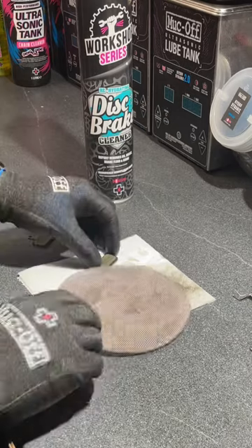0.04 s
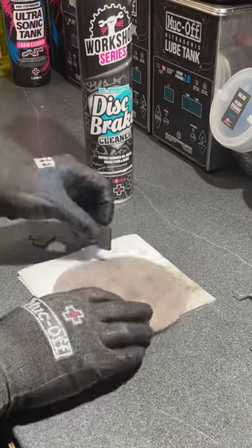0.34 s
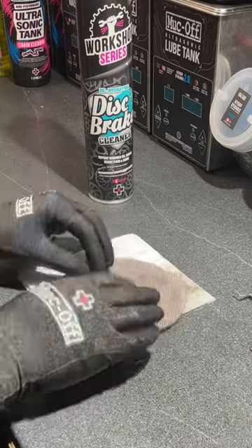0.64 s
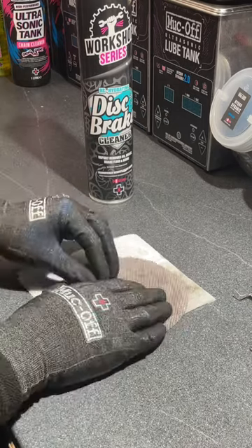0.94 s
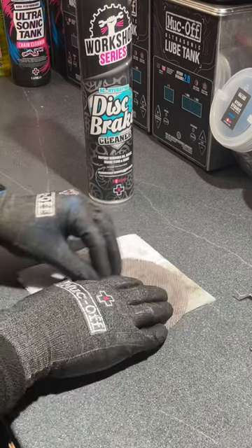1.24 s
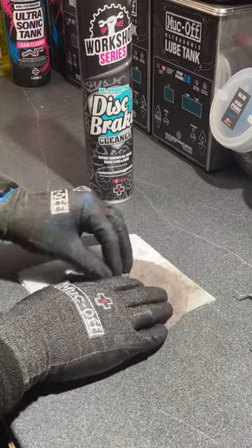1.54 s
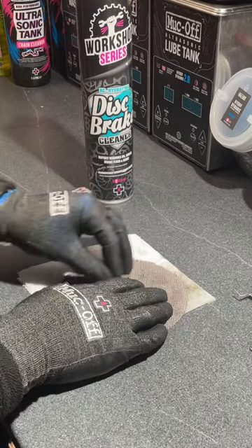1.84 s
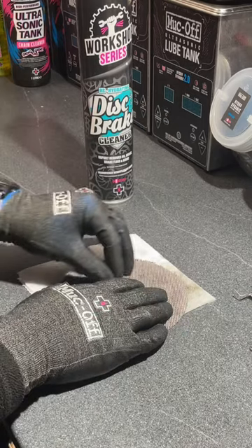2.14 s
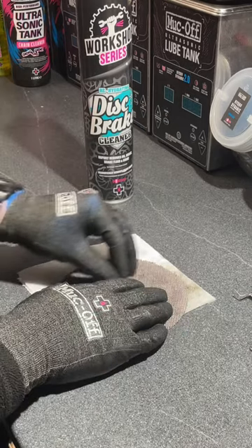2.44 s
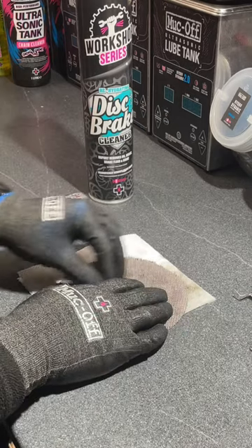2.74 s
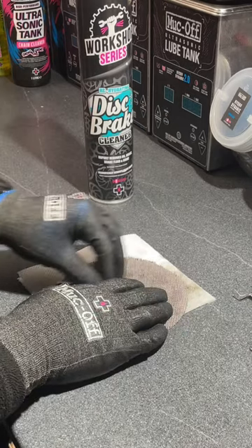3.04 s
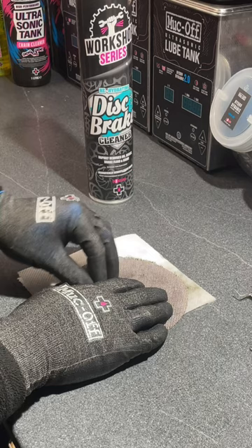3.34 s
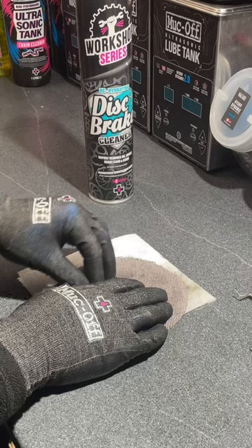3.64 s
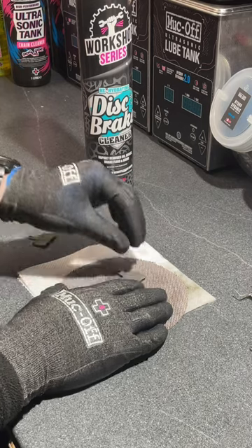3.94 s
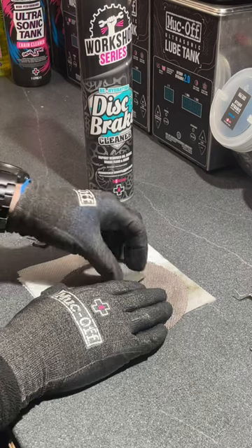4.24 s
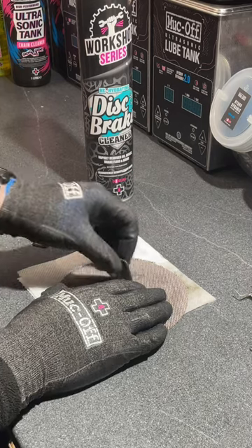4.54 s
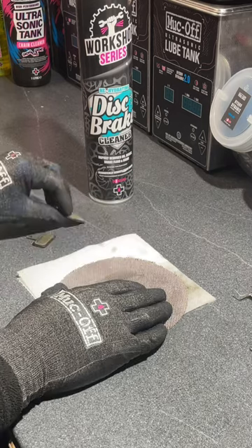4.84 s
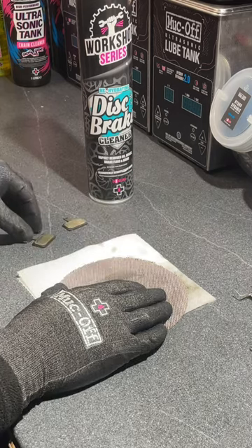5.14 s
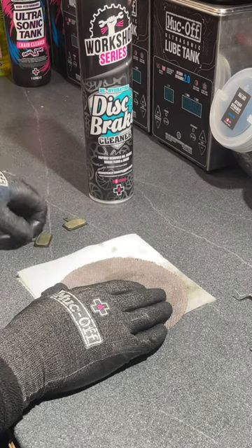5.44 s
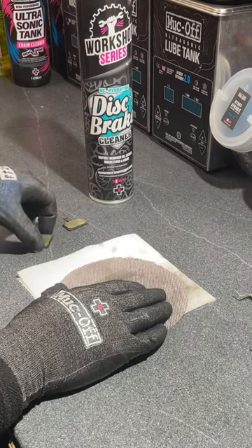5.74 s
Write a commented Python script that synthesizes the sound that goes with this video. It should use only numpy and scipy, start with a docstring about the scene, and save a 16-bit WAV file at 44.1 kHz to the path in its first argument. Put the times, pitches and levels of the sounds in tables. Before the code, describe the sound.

At first there is only faint glove rustle and a few tiny ticks of a small brake pad between fingertips. From about 0.9 seconds the pad is scrubbed rapidly back and forth on an abrasive disc, around twelve short, gritty strokes a second. The rasping grows a little louder and brighter, while the workbench rumbles and gives a few dull bumps underneath. The scrubbing stops at about 3.7 seconds, leaving soft rustles and light taps. At about 4.75 seconds the pad drops onto the bench, skids briefly and bounces in a sharp, bright clatter with a slight metallic ping, the loudest moment, settling before 5 seconds. A lighter click comes at 5.3 seconds, then a soft, deep thud of a hand at 5.5, followed by faint scrapes and glove swishes. Everything sounds close, in a small workshop with little echo and a faint low rumble of air.

```python
"""A small bicycle brake pad is scrubbed to and fro by a gloved hand on an abrasive disc on a workbench.
Grit catches the pad, so each stroke rasps, and the drag makes the bench rumble. Then the pad is
dropped: it clatters, skids and rattles. A pad clicks on the bench top, and the hand comes down with
a soft thud. Gloves rustle in between, over the low rumble of the room's air."""
import sys
import numpy as np
from scipy import signal
from scipy.fft import rfft, irfft, next_fast_len
from scipy.io import wavfile
from scipy.ndimage import uniform_filter1d, map_coordinates

SR = 44100
rng = np.random.default_rng(int(sys.argv[2]) if len(sys.argv) > 2 else 0)


def file_out(sig):
    """Save sig as 16-bit WAV at sys.argv[1]."""
    # one column per channel
    cols = np.atleast_2d(sig).T
    # limit, then scale
    lim = np.clip(cols, -1, 1)
    pcm = np.round(lim * 32767).astype(np.int16)
    wavfile.write(sys.argv[1], SR, pcm)


N = 259749
TIME = np.arange(N) / SR
FFT_SIZE = next_fast_len(N + SR // 2, True)
FREQS = np.arange(FFT_SIZE // 2 + 1) * SR / FFT_SIZE

# Levels in the tables are relative: the functions add their own gains.
# The strokes, away and back in turn. Each row: start in seconds, rasp level in dB, then brightness,
# fine hiss and judder, each in dB compared with the rasp.
STROKES = [(0.878, -43.5, -13, -5.5, -1), (0.958, -42, -18, -3, 0.5), (1.05, -41.5, -2.5, -0.5, 0.5),
           (1.132, -41, -10, -2.5, 3.5), (1.217, -36.5, -14, -6.5, -6.5), (1.29, -42.5, -0.5, 1.5, 3.5),
           (1.373, -36.5, -5, -5, -4.5), (1.451, -41.5, -0.5, -2, 4), (1.533, -37, -6, -3.0, -5),
           (1.607, -40, 0, -2.0, 2), (1.69, -37, -1, -2.5, -2), (1.766, -41.0, 3.5, 0.5, 4),
           (1.845, -35.5, -1.5, -3.0, -3.5), (1.92, -39.5, 1, -2, 6.5), (2.003, -35, -3, -3.5, -4),
           (2.08, -41, 1.5, 1.5, 10), (2.16, -34, 0, 0, -4), (2.238, -39.5, 3.5, 3.5, 5.5),
           (2.317, -35, 2, -1.5, -3.5), (2.397, -38, 3.5, 2.5, 2.5), (2.476, -35, -4.5, 0, -4),
           (2.555, -37.0, 1, 1.5, 4), (2.63, -37.5, 1.5, 4, 2), (2.711, -36.5, 2.5, 0.5, 6),
           (2.786, -35.5, 0.5, 3, -3), (2.867, -38, 3.0, 2.0, 5.5), (2.943, -37.5, 1.5, 4, 3.5),
           (3.024, -38.5, 4.5, 3, 4), (3.101, -39, 4.5, 5.5, 6), (3.183, -38.5, 5.5, 5, 7),
           (3.256, -39.5, 3, 7.5, 0.5), (3.335, -38.0, -1.5, 2.5, 5.0), (3.413, -37, 0.5, 6.5, 1),
           (3.49, -35, -11, 2.5, 1.5), (3.571, -33.5, -15.5, 2.5, 4.0)]
SCRUB_END_S = 3.68
# Tone colours. Each row: frequency in Hz, level there in dB.
GRIT_COLOUR = [(200, -11.5), (450, -1), (900, -3), (1150, -5), (2000, 3.5), (3300, 4.5), (4400, -8),
               (5800, -13.5), (8500, -14.5), (11000, -20), (13500, -18), (16000, -34)]  # grit on the pad's face
STRIKE_COLOUR = [(100, -18.5), (450, -6.5), (620, -12.5), (800, -6), (1300, -5.5), (1900, -4), (3000, -2.5),
                 (5000, -1), (8000, -4), (10500, -7.5), (13500, 2.5), (16000, -21.5)]  # a pad hitting the bench
SWISH_COLOUR = [(2000, -12), (3800, -7.5), (6000, -2.5), (9000, 0), (12000, 1), (14000, -3), (16000, -17.5)]  # a glove's bright swish
SCUFF_COLOUR = [(300, 6.5), (800, 0.5), (1400, -2), (2400, -5.5), (3500, -6.5), (6000, -6), (12000, -40)]  # a glove's duller scuff
THUD_COLOUR = [(25, -32), (40, -16), (55, -0.5), (100, 1), (200, -5), (330, -20.5), (520, -19.5),
               (700, -33.5), (3000, -49.5), (8000, -75)]  # the hand bumping the bench
AIR_COLOUR = [(12, -47), (20, -29), (60, -10.5), (158, 1.5), (210, -5.5), (270, -8.5), (738, -29),
              (4180, -43.5), (6360, -41.5), (11400, -41.5), (12400, -39.5), (13900, -58), (16000, -65)]  # the room's air
# Resonances, the pitches at which a thing rings. Each row: pitch in Hz, width in Hz, gain in dB.
RASP_MODES = [(1110, 24, -4), (1285, 40, 11), (1461, 40, 3), (1579, 78, 5.5), (1800, 64, 4),
              (1909, 71, 10.5), (2167, 40, -5.5), (2279, 117, 1), (2930, 89, -5), (3185, 84, -2),
              (3493, 73, 1), (3780, 41, -6.5), (4153, 70, 10), (4267, 54, 9.5), (4680, 94, 0.5),
              (4910, 45, 7), (5200, 65, 6.5), (5620, 69, 4.5), (6430, 29, -0.5), (6870, 25, 3.5),
              (7720, 250, -10), (9360, 120, -4), (10570, 200, -3)]  # the held pad and the bench top
JUDDER_MODES = [(417.5, 13, 2.5), (461.6, 25.5, 0.5), (526, 16, -2.5), (658, 110, -4), (763, 35, 7),
                (940, 17, -7)]  # the pad shaking in the fingers
BENCH_MODES = [(104.6, 5.8, 3), (132, 14, 2), (168, 9.2, -2.5), (214.8, 20, -3.5), (283.4, 5.3, -1),
               (320, 120, -13), (469, 170, -11)]  # the whole bench
LOOSE_PAD_MODES = [(768, 34, 10), (860, 50, -2), (965, 55, 7), (1820, 190, 8), (2250, 80, 7.5),
                   (3080, 90, -2), (3600, 260, -3), (4540, 240, 5), (5350, 260, 2), (6240, 130, 1),
                   (7620, 220, 2), (8500, 220, -1), (9200, 260, 1)]  # the loose pad on the bench top
# Gaps where the held pad's resonances cancel. Each row: frequency in Hz, width in Hz.
NOTCHES = [(1685, 70), (2050, 45), (2660, 50), (3920, 90), (5070, 70), (5830, 120), (7400, 170)]
# A pad hits the bench top. Each row: time in seconds, level in dB, treble cut-off in Hz.
STRIKES = [(4.411, -35.5, 1160), (4.433, -38.5, 2460), (4.7494, -9.5, 6300), (4.752, -17, 5500),
           (4.8345, -18, 10100), (4.8374, -4.5, 15200), (4.839, -8.5, 14000), (4.8630, -17, 12000),
           (4.8698, -15, 12000), (4.871, -12.5, 12000), (4.8828, -24.5, 10000), (4.8902, -14.5, 10000),
           (4.892, -15.5, 10940), (4.9036, -18, 8050), (4.9054, -17, 10130), (4.9140, -18, 10000),
           (4.917, -25, 10000), (4.9242, -22, 10000), (5.304, -18.5, 5960), (5.3057, -11.5, 5120)]
# The pad's metal backing plate rings. Each row: pitch in Hz, level in dB, seconds to fade by 60 dB.
PLATE_MODES = [(10920, -26, .08), (11100, -37, 0.08), (13100, -40.5, .09)]
# A pad chatters on its edges. Each row: start in seconds, level in dB, length in seconds,
# treble cut-off in Hz.
RATTLES = [(4.761, -38.5, 0.02, 5080), (4.835, -32.5, 0.043, 13900), (4.891, -40, 0.025, 11000),
           (5.312, -45, 0.013, 6000)]
# The dropped pad skids on its edge. Each row: time in seconds, pitch in Hz, level in dB.
SKID_PATH = [(4.755, 1900, -66), (4.766, 1950, -44), (4.777, 2250, -36.5), (4.792, 2400, -48),
             (4.806, 2150, -48.5), (4.826, 2000, -50.5), (4.836, 2000, -75.5)]
# A pad slides a little. Each row: start in seconds, level in dB, length in seconds,
# centre of its band in Hz, width of the band in Hz.
SLIDES = [(4.92, -45, 0.018, 890, 404), (5.158, -62, 0.056, 940, 400), (5.261, -54.5, 0.047, 2760, 1140),
          (5.306, -44.5, 0.019, 4900, 596), (5.345, -61, 0.052, 980, 400), (5.617, -51, 0.019, 1920, 688),
          (5.65, -56.5, 0.022, 2470, 900), (5.811, -58.5, 0.016, 2700, 1400),
          (5.833, -55, 0.016, 1930, 1610)]
# The whole bench is jolted. Each row: time in seconds, level in dB.
KNOCKS = [(0.557, -47), (1.236, -49), (1.719, -33), (2.178, -28.5), (2.967, -29.5), (3.321, -35.5),
          (3.655, -41), (4.7502, -48), (4.837, -41), (5.016, -38), (5.306, -46), (5.484, -38), (5.512, -37)]
# Brief touches. Each row: start in seconds, level in dB, length in seconds.
THUDS = [(1.43, -51, 0.28), (5.461, -38.5, 0.047), (5.478, -37.5, 0.037), (5.54, -48, 0.067)]  # hand and wrist on the bench
TICKS = [(.455, -59, 0.0044), (.507, -53.5, .002), (.529, -58, 0.0049), (.555, -59.5, 0.0024),
         (.677, -56, 0.0023), (4.01, -70, 0.0082), (4.135, -60.5, 0.017), (4.175, -68, .004),
         (4.237, -65, 0.0043), (4.431, -63, 0.0089), (5.134, -73, 0.0035), (5.842, -66.5, 0.0067)]  # the pad between the fingertips
# A glove slides. Each row: start in seconds, length in seconds, swish in dB, scuff in dB.
GLOVE_MOVES = [(-.02, 0.35, -64.5, -96), (0.115, 0.082, -74, -60.5), (0.393, 0.17, -60, -79),
               (0.671, 0.041, -57, -67), (0.848, 0.024, -68, -64), (3.74, 0.035, -73, -62.5),
               (3.858, 0.071, -77, -79), (4.118, 0.11, -74.5, -74.5), (4.363, 0.2, -85, -69.5),
               (5.124, 0.12, -90, -67.5), (5.286, 0.096, -70, -62.5), (5.596, 0.082, -76, -63),
               (5.676, 0.14, -68, -77)]
# How alike the two microphone openings sound. Each row: frequency in Hz, likeness (1 is the same).
STEREO_LIKENESS = [(100, .9998), (400, .996), (700, .975), (1200, .62), (1700, .82), (2500, .8),
                   (3200, .94), (4300, .84), (5200, .62), (6200, .76), (7100, .88), (13000, .86)]
# Sound reaches the left opening first. Each row: frequency in Hz, head start in radians.
LEFT_LEAD = [(3200, 0), (4200, .4), (5200, 1.25), (6300, .7), (7100, .3), (8500, .7), (10000, 1.5),
             (12500, 2.2), (15000, 3)]


def scrubbing(stick_share=.12, stuck_db=-10):
    """The pad sticks for the first part of each stroke, then breaks free; pad and bench shake."""
    speed, progress, stroke = stroke_motion()
    rasp_db, hiss_db, bright_db, judder_db, rumble_db = stroke_levels(stroke, progress)
    free = uniform_filter1d(np.where(progress < stick_share, from_db(stuck_db), 1.), 150)
    return (grit_rasp(speed, free, rasp_db, hiss_db, bright_db)
            + pad_judder(speed, free, rasp_db + judder_db) + bench_rumble(speed, rumble_db))


def stroke_motion(away_skew=.94, back_skew=.91, crawl=.15):
    """The hand slows at each turn. Gives speed (0-1), progress in the stroke (0-1) and stroke number."""
    turns = [row[0] for row in STROKES] + [SCRUB_END_S]
    strokes_done = np.interp(TIME, turns, np.arange(len(turns)))
    stroke = np.minimum(strokes_done.astype(int), len(STROKES) - 1)
    progress = strokes_done - stroke
    moving = uniform_filter1d(1. * ((TIME > turns[0]) & (TIME < turns[-1])), 600)
    swing = np.abs(np.sin(np.pi * progress ** np.where(stroke % 2, back_skew, away_skew)))
    speed = np.abs(moving) * (crawl + (1 - crawl) * swing)
    return speed, progress, stroke


def stroke_levels(stroke, progress, away_db=-6.5, back_db=-13, push_db=-5, chance_db=1.2):
    """Each stroke's levels in dB. The rumble follows effort, direction and a little chance."""
    _, rasp, bright, hiss, judder = np.array(STROKES)[stroke].T
    effort_db = uniform_filter1d(rasp, size=SR // 6)  # how hard the hand bears down
    going_back = stroke % 2 == 1
    luck = rng.standard_normal(stroke.max() + 1)[stroke]
    # near the far end of each away stroke the hand pushes into the bench
    push = from_db(push_db) * np.exp(-((progress + going_back - .787) / .1) ** 2)
    drag = from_db(np.where(going_back, back_db, away_db))
    rumble = effort_db + 20 * np.log10(drag + push) + chance_db * luck
    return [uniform_filter1d(db, 300) for db in (rasp, hiss, bright, judder, rumble)]


def grit_rasp(speed, free, rasp_db, hiss_db, bright_db, split_hz=5200, dulling_db_per_s=2.94):
    """Grit catches the pad in tiny snaps. With speed the coarse rasp levels off and fine hiss grows."""
    grit = held_pad(colour(snaps(8000, 1.7), GRIT_COLOUR))
    coarse = brighten(filtered(grit, 4, split_hz), bright_db, above_hz=2700)
    fine = filtered(grit, 4, split_hz, "high")
    # the top of the hiss fades as the pad beds in
    fine = brighten(fine, dulling_db_per_s * (SCRUB_END_S - TIME), above_hz=10500)
    bite = np.tanh((speed / .9) ** 2.5) * free
    crawl_hiss = from_db(-22) * np.tanh(20 * speed)
    hiss = from_db(hiss_db + 8) * (speed ** 3.3 * free + crawl_hiss)
    return from_db(rasp_db + 1.5) * (coarse * bite + fine * hiss)


def held_pad(grit, waver_db=2.8, detune_share=.008):
    """The pad rings. Contact and grip wander, so its resonances come and go and shift in pitch."""
    ringing = grit + sum(resonate(grit, [mode]) * from_db(waver_db * drift(16)) for mode in RASP_MODES)
    for hz, width in NOTCHES:
        ringing = signal.lfilter(*signal.iirnotch(hz, hz / width, fs=SR), ringing)
    # reading the samples a little faster or slower bends the pitch
    positions = np.arange(N) + np.cumsum(detune_share * drift(13))
    bent = [map_coordinates(stream, [positions], order=5, mode="mirror") for stream in ringing]
    return unit_level(np.array(bent))


def pad_judder(speed, free, judder_db, limit_db=-34):
    """The pad shakes in the fingers and hums; the hum's level is capped."""
    hum = unit_level(resonate(snaps(6000, 1.0), JUDDER_MODES))
    return hum * from_db(np.minimum(judder_db, limit_db) - 5) * speed ** .9 * free


def bench_rumble(speed, rumble_db, waver_db=2.5):
    """The pad's uneven drag shakes the bench at its low resonances."""
    drag = snaps(2500, .66)
    pressure = from_db(rumble_db + .5 + waver_db * drift(50)) * speed ** .27
    rumble = resonate(drag * pressure, BENCH_MODES) / np.std(resonate(drag, BENCH_MODES))
    return filtered(rumble, 4, [58, 700], "band")


def clatter(level_db=3, snap_fade_s=.005, echo_fade_s=.045):
    """Each strike cracks, echoes off the bench top and the tins on it, and rings the pad."""
    age = np.arange(SR // 3) / SR
    fade = from_db(-7 - 60 * age / snap_fade_s) + from_db(-16 - 60 * age / echo_fade_s)
    cracks = np.zeros((2, N))
    for start_s, db, cutoff_hz in STRIKES:
        crack = rng.standard_normal((2, len(age))) * fade
        crack[:, 0] = 1, .3  # the instant of contact
        start = int(start_s * SR)
        cracks[:, start:start + len(age)] += from_db(db + level_db) * filtered(crack, 2, cutoff_hz)
    clacks = colour(cracks, STRIKE_COLOUR)
    return clacks + resonate(clacks, LOOSE_PAD_MODES) + plate_ping()


def plate_ping():
    """The hardest strike sets the pad's metal backing plate ringing."""
    hardest_s = max(STRIKES, key=lambda row: row[1])[0]
    age = np.maximum(TIME - hardest_s, 0)
    return sum(from_db(np.maximum(db - 60 * age / fade_s, -200)) * np.sin(2 * np.pi * hz * age)
               for hz, db, fade_s in PLATE_MODES)


def rattles(level_db=1):
    """After landing, a pad chatters on its edges in many tiny strikes until it lies still."""
    chatter = colour(snaps(4200, 1.8), STRIKE_COLOUR)
    chatter = unit_level(chatter + resonate(chatter, LOOSE_PAD_MODES))
    return sum(filtered(chatter, 2, cutoff_hz) * bursts([(start, db + level_db, length)], rise_s=.00071)
               for start, db, length, cutoff_hz in RATTLES)


def skid(level_db=-3, roughness_hz=260):
    """The pad's edge slips unevenly, sounding one thin, rough note that rises and falls."""
    times, pitches, levels = np.transpose(SKID_PATH)
    hz, db = np.interp(TIME, times, pitches), np.interp(TIME, times, levels)
    slips = unit_level(filtered(snaps(3300, 1.5), 2, roughness_hz))
    sliding = (TIME > times[0]) & (TIME < times[-1])
    note = np.sqrt(2) * np.sin(2 * np.pi * np.cumsum(hz) / SR)
    return from_db(db + level_db) * sliding * slips * note


def scrapes(level_db=-2):
    """A pad catches and slips in short slides, each a burst of snaps in one band of pitch."""
    catches = snaps(3000, 2.8) * from_db(2.5 * drift(140))
    out = 0
    for start, db, length, hz, width in SLIDES:
        edge_ratio = np.exp(np.arcsinh(width / hz / 2))  # band edges lie evenly about the centre pitch
        band = filtered(catches, 2, [hz / edge_ratio, hz * edge_ratio], "band")
        out = out + unit_level(band) * bursts([(start, db + level_db, length)], rise_s=.0025)
    return out


def knocks(level_db=-1):
    """Soft pushes make the bench boom, alike on the left and the right."""
    pushes = np.zeros(N)
    for start, db in KNOCKS:
        pushes[int(start * SR)] = from_db(db + level_db)
    boom = resonate(filtered(pushes + 1e-18, 4, [75, 280], "band"), BENCH_MODES)
    return np.array([boom * pushes.max() / np.abs(boom).max(), np.zeros(N)])


def hand_thuds(level_db=2):
    """Hand and wrist press and bump on the bench with a soft, deep sound."""
    thud = unit_level(colour(snaps(9100, .83), THUD_COLOUR))
    return from_db(level_db) * thud * bursts(THUDS, rise_s=.004)


def finger_ticks():
    """The pad ticks between the fingertips in very brief bursts of bright snaps."""
    bright = filtered(snaps(9000, 2.0), 1, [1500, 11000], "band")
    return unit_level(bright) * bursts(TICKS, rise_s=.00028)


def glove_rustle(fade_s=.073):
    """Glove fabric swishes and scuffs as it slides; each move swells and fades."""
    swish_level, scuff_level = 0, 0
    for start, length, swish_db, scuff_db in GLOVE_MOVES:
        inside_s = np.minimum(TIME - start, start + length - TIME)
        swell = np.clip(.5 + inside_s / fade_s, 0, 1)
        swish_level += from_db(swish_db) * swell
        scuff_level += from_db(scuff_db) * swell
    swish = unit_level(colour(snaps(7800, 1.6), SWISH_COLOUR)) * from_db(1.86 * drift(90))
    scuff = unit_level(colour(snaps(13000, 2.9), SCUFF_COLOUR)) * from_db(-1 + 2.9 * drift(64))
    return swish * swish_level + scuff * scuff_level


def room_air(level_db=-61.5, waver_db=2):
    """The room's air is a low rumble whose level wavers."""
    level = from_db(level_db + waver_db * drift(38))
    return level * unit_level(colour(rng.standard_normal((2, N)), AIR_COLOUR))


def room_echo(x, echo_db=-21, fade_s=.18, build_s=.046):
    """The workshop adds a short, dull echo without bass, different on each side."""
    age = np.arange(SR // 2) / SR
    tail = rng.standard_normal((2, len(age))) * from_db(-60 * age / fade_s) * (1 - np.exp(-age / build_s))
    tail = filtered(tail / np.sqrt(np.sum(tail[0] ** 2)), 2, [450, 5500], "band")
    return x + from_db(echo_db) * signal.fftconvolve(x, tail, axes=1)[:, :N]


def stereo(pair):
    """Two close microphone openings share the first stream; the second, scattered sound, differs."""
    alike = np.clip(across_freqs(STEREO_LIKENESS), -1, 1)
    common, scattered = rfft(pair, FFT_SIZE)
    sides = np.array([[1], [-1]])
    both = np.sqrt((1 + alike) / 2) * common + sides * np.sqrt((1 - alike) / 2) * scattered
    return irfft(both * np.exp(.5j * sides * across_freqs(LEFT_LEAD)), FFT_SIZE)[:, :N]


def snaps(per_s, spread_db):
    """Two unrelated streams of tiny random snaps of uneven size."""
    sizes = from_db(spread_db * np.minimum(rng.exponential(1, (2, N)), 5))
    return unit_level(sizes * rng.standard_normal((2, N)) * (rng.random((2, N)) < per_s / SR))


def bursts(rows, rise_s):
    """The loudness curve of brief touches that swell and die away."""
    power = 0
    for start, db, length in rows:
        age = np.maximum(TIME - start, 0)
        rise = 1 - np.exp(-age / rise_s)
        fall = np.exp(-np.minimum((age / length) ** 2 / 2, 50))
        power = power + (from_db(db) * rise * fall) ** 2
    return np.sqrt(power)


def drift(per_s):
    """A curve that glides between random values around zero, per_s of them a second."""
    values = rng.standard_normal(N // 20)
    return np.interp(TIME * per_s, np.arange(len(values)), values)


def resonate(x, modes):
    """Lets x ring each resonance and adds up the results."""
    out = 0
    for hz, width, db in modes:
        decay = np.exp(-np.pi * width / SR)
        feed = np.array([1, 0, -1]) * (1 - decay ** 2) / 2
        feedback = [1, -2 * decay * np.cos(2 * np.pi * hz / SR), decay ** 2]
        out = out + from_db(db) * signal.lfilter(feed, feedback, x)
    return out


def colour(x, spectrum):
    """Gives x a tone colour, with no ringing ahead of a snap (a minimum-phase filter)."""
    cepstrum = irfft(np.log(from_db(across_freqs(spectrum))), FFT_SIZE)
    cepstrum[1:FFT_SIZE // 2] *= 2
    cepstrum[FFT_SIZE // 2 + 1:] = 0
    return irfft(rfft(x, FFT_SIZE) * np.exp(rfft(cepstrum)), FFT_SIZE)[..., :N]


def brighten(x, db, above_hz):
    """Turns the treble up or down by an amount that can change over time."""
    treble = signal.sosfiltfilt(signal.butter(3, above_hz, "high", fs=SR, output="sos"), x)
    return x + (from_db(db) - 1) * treble


def filtered(x, order, hz, keep="low"):
    """Keeps the lows, the highs or a band; a higher order cuts more steeply."""
    return signal.sosfilt(signal.butter(order, hz, keep, fs=SR, output="sos"), x)


def across_freqs(points):
    """Joins a table's points into a curve over all frequencies, spaced by pitch."""
    hz, value = np.transpose(points)
    return np.interp(np.log(FREQS + 1), np.log(hz), value)


def unit_level(x):
    """Scales x to an average (rms) level of 1."""
    return x / np.sqrt(np.mean(x ** 2) + 1e-20)


def from_db(db):
    """Turns decibels into a plain gain."""
    return 10 ** (np.asarray(db) / 20)


def scene():
    """Work on the bench, heard in a small workshop."""
    pad = scrubbing() + clatter() + rattles() + skid() + scrapes()
    hand = knocks() + hand_thuds() + finger_ticks() + glove_rustle()
    return room_echo(stereo(pad + hand + room_air()))


def record(dry, low_hz=46, top_hz=15700):
    """The microphone sheds the deepest bass, and the highest treble is cut steeply."""
    lean = filtered(dry, 2, low_hz, "high")
    return signal.sosfilt(signal.ellip(10, .2, 80, top_hz, fs=SR, output="sos"), lean)


dry = scene()
out = record(dry)
file_out(out)
```